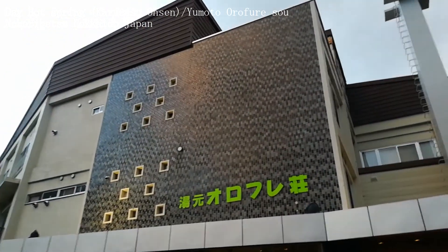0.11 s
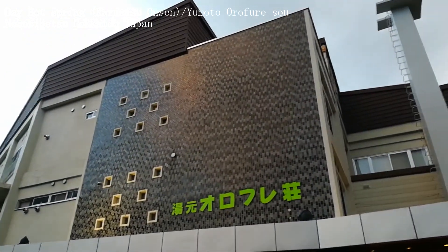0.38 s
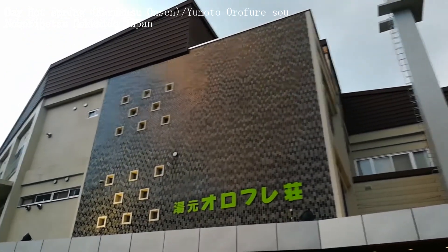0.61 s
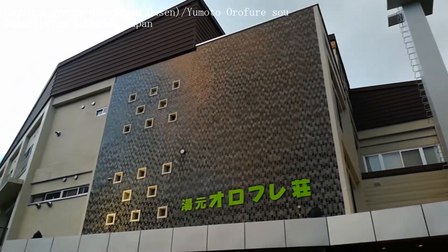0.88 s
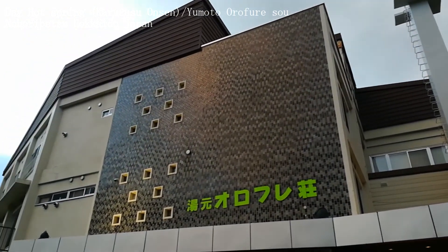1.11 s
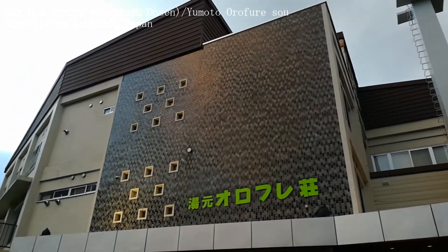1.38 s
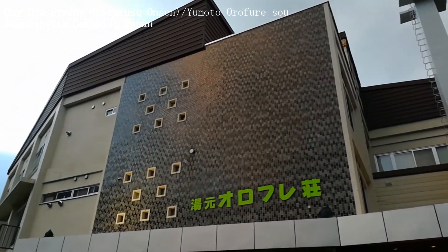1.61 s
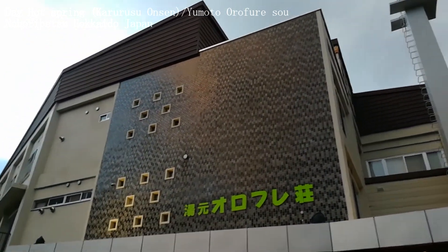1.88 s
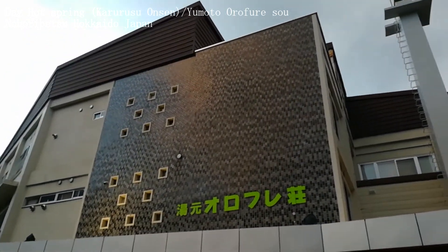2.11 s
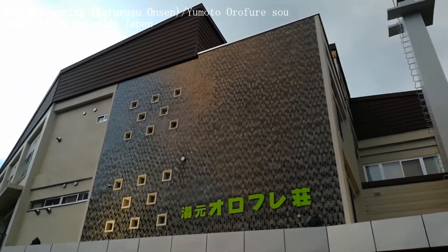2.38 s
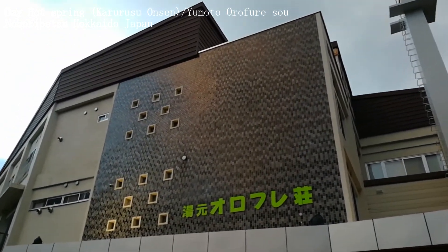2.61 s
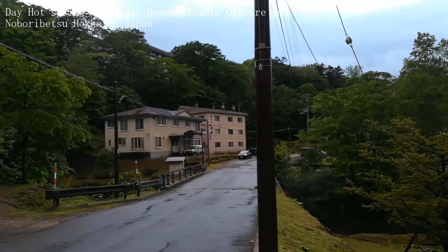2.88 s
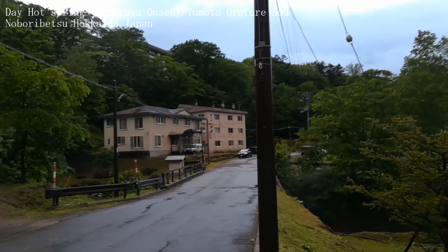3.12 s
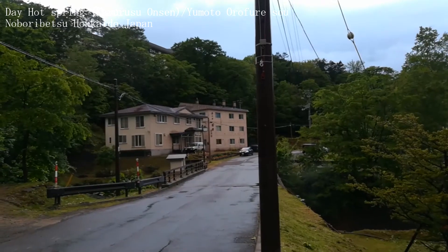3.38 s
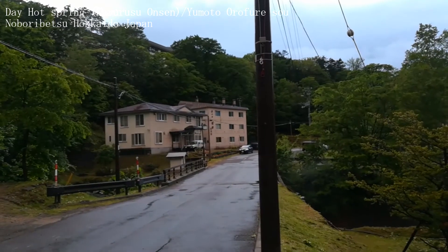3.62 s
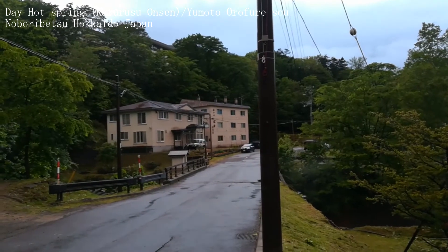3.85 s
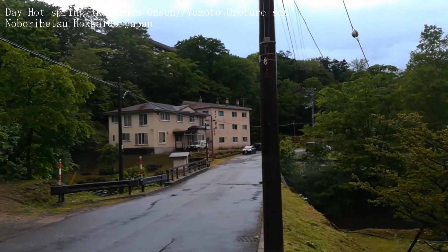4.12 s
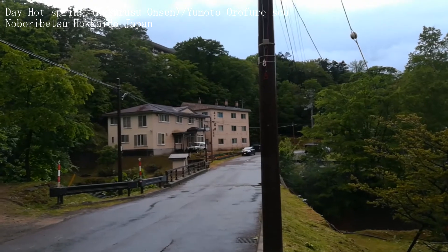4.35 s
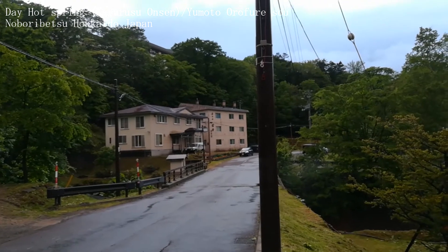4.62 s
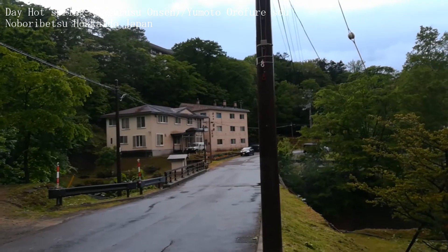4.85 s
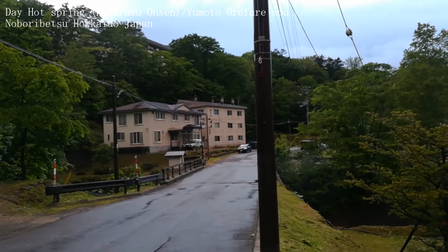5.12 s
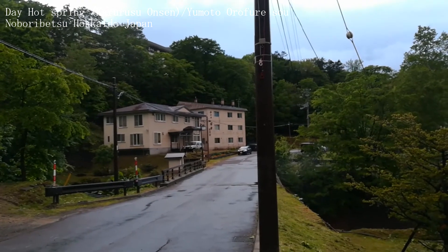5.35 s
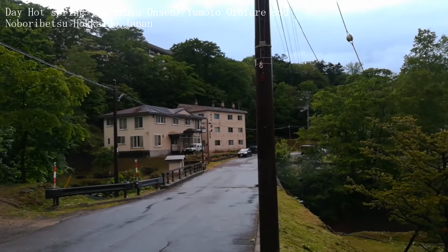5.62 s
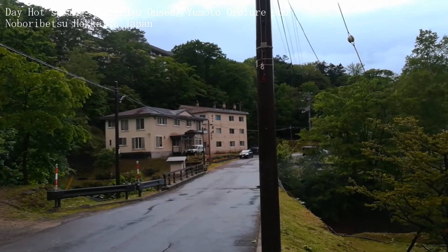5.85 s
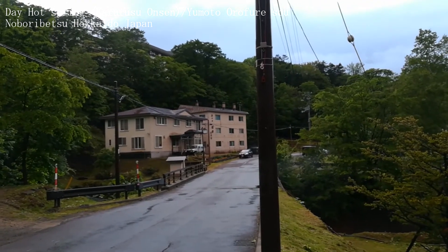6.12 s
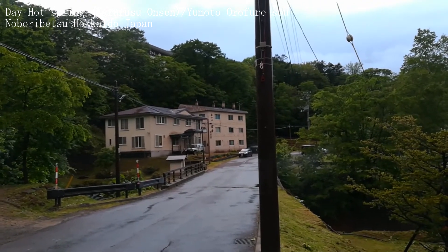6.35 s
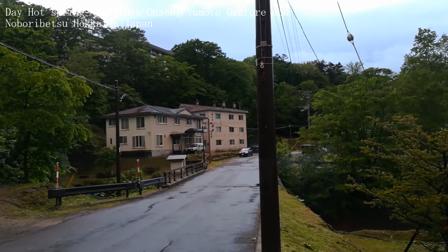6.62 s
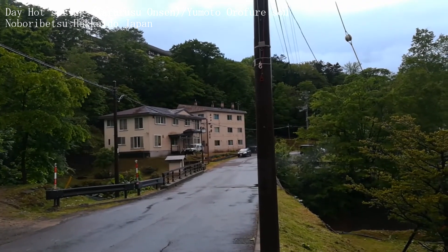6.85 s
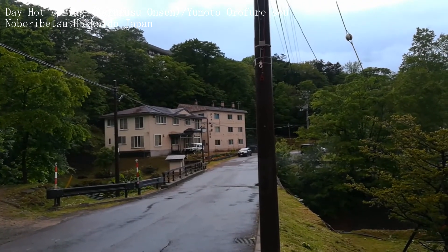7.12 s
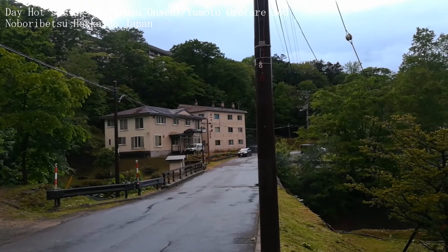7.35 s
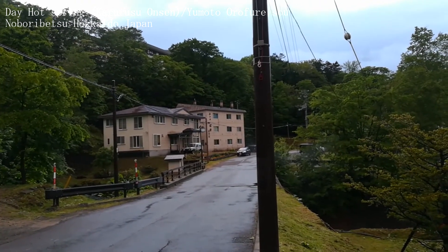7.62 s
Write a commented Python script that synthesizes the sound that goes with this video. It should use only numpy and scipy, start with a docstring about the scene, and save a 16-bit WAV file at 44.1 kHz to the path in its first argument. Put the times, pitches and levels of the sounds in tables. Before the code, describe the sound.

Quiet rushing water and soft wind bumps, two distant bird trills, an abrupt short gap, then a fuller stream with a low unsteady machine hum.

```python
"""Two outdoor shots, both with a stream rushing out of sight (shaped noise, brighter on the left port),
low air rumble rolling under it (slow swells) and light wind bumping the ports (lumps of low noise).
In the first shot a far bird soon trills faintly (short falling tones with a noisy tail).
Then comes a hard cut and a short silence. The second shot fades in, and a machine hums in it
(two unsteady sine tones)."""
import sys
import numpy as np
from scipy import signal
from scipy.fft import rfft, irfft, next_fast_len
from scipy.io import wavfile
from scipy.ndimage import uniform_filter1d, map_coordinates

SR = 44100
rng = np.random.default_rng(int(sys.argv[2]) if len(sys.argv) > 2 else 0)


def gain_from_db(level_db):
    """Turn a decibel level (scalar or array-like) into a linear amplitude factor."""
    decades = np.asarray(level_db, float) / 20
    return 10 ** decades


def wrap_up_sound(samples):
    """Save the sound to the file named by the first command line argument, as 16-bit audio."""
    columns = np.atleast_2d(samples).T
    # keep every value between -1 and 1, then stretch to whole-number steps
    tamed = np.clip(columns, -1, 1)
    steps = np.round(tamed * 32767).astype(np.int16)
    wavfile.write(sys.argv[1], SR, steps)


N = 340893  # length in samples

CUT_S, BACK_S = 2.612, 2.763  # the first shot is cut, the second shot enters (seconds)


def unit(x):
    """Scales each channel to rms 1."""
    return x / np.sqrt(np.mean(x ** 2, axis=-1, keepdims=True) + 1e-20)


def along(points, at, log=False):
    """Reads every column after the first between its points, on a straight or log axis."""
    x, *columns = np.transpose(points)
    warp = np.log1p if log else np.asarray
    return np.array([np.interp(warp(at), warp(x), column) for column in columns])


def wobble(rate):
    """A smooth random curve through a given number of random points a second."""
    points = rng.standard_normal(int(N * rate / SR) + 4)
    return map_coordinates(points, [np.arange(N) * rate / SR])


def bump(t, centre, width):
    """A smooth bell-shaped rise and fall of height 1."""
    return np.exp(-.5 * ((t - centre) / width) ** 2)


def buffet():
    """Light wind bumps each port on its own: low noise in short lumps, stronger during gusts."""
    # Tone colour of the bumps. Each row: frequency in Hz, relative level in dB per Hz.
    bump_colour = [(20, -8), (45, -6.5), (80, 1), (110, -6), (160, -11.5), (300, -40), (20000, -120)]
    # Gusts on the ports. Each row: centre in seconds, half width in seconds, peak in dB.
    gusts = [(1.15, .07, -68), (1.8, .25, -64.5), (2.45, .08, -64), (3.6, .5, -70), (4.8, 0.23, -78)]
    still_db, lumps_db = -78, 4  # the air between gusts, strength of the lumps
    m = next_fast_len(N + 8192)
    colour = gain_from_db(along(bump_colour, np.fft.rfftfreq(m, 1 / SR), log=True))
    air = irfft(rfft(rng.standard_normal((2, m))) * colour, m)[:, :N]
    lumps = gain_from_db(lumps_db * np.array([wobble(14), wobble(14)]))
    air = unit(air * lumps)
    t = np.arange(N) / SR
    gust_gain = sum(gain_from_db(db) * bump(t, centre, width) for centre, width, db in gusts)
    return air * (gain_from_db(still_db) + gust_gain)


def hum():
    """The machine: two sine tones an octave apart, slightly unsteady in pitch and level."""
    # How strong the tones are, before scene() sets them slightly left.
    # Each row: time in seconds, lower tone in dB, upper tone in dB.
    tone_levels = [(2.75, -60, -61.5), (3.4, -62, -61), (3.9, -54.5, -59), (4.1, -53, -68),
                   (4.8, -59.5, -71), (5.3, -60.5, -63.5), (5.7, -59.5, -68), (6.45, -56.5, -79),
                   (6.6, -67, -77)]
    low_hz, drift_hz, flutter_db = 66.6, 0.36, 0.93
    t = np.arange(N) / SR
    phase = 2 * np.pi * np.cumsum(low_hz + drift_hz * wobble(2.89)) / SR
    low_db, high_db = along(tone_levels, t)
    tones = gain_from_db(low_db) * np.sin(phase) + gain_from_db(high_db) * np.sin(2 * phase)
    return np.sqrt(2) * tones * gain_from_db(flutter_db * wobble(6)) * (t > CUT_S)


def bird():
    """Short falling chips at an even pace, each trill moving left; the trees smear them into a tail."""
    # Far trills. Each row: start in seconds, length in seconds, pitch in Hz,
    # left level in dB, right level in dB (before the scatter, turn and tail below).
    trills = [(.205, .26, 3750, -55.5, -63), (.83, .18, 3800, -56.5, -63)]
    note_every_s, note_s = .04, .042
    scatter_hz, scatter_db = 45, 2  # how much the notes differ
    turn_db = 4  # the left gains this much over a trill, the right loses it
    fall = .035  # drop in pitch over a note, as a share of the pitch
    tail_s, tail_gain = .2, .55  # time for the tail to die by 60 dB, strength of the tail
    out = np.zeros((2, N + SR))
    t = np.arange(int(note_s * SR)) / SR
    for start, length, trill_hz, *db in trills:
        for after in np.arange(0, length, note_every_s):
            pitch, *size = rng.standard_normal(3)
            hz = trill_hz + scatter_hz * pitch
            tone = np.sin(2 * np.pi * hz * t * (1 + fall / 2 * (1 - t / note_s)))
            note = np.sin(np.pi * t / note_s) * tone
            turn = turn_db * (after / length - .5) * np.array([1, -1])
            level_db = db + scatter_db * np.array(size) + turn
            first = round((start + after - note_s / 2) * SR)
            out[:, first:first + len(t)] += np.sqrt(2) * gain_from_db(level_db)[:, None] * note
    t = np.arange(SR // 3) / SR
    tail = rng.standard_normal((2, len(t))) * gain_from_db(-60 * t / tail_s)
    tail /= np.linalg.norm(tail, axis=1, keepdims=True)
    smeared = signal.fftconvolve(out, tail, axes=1)[:, :N + SR]
    return (out + tail_gain * smeared)[:, :N]


def rush(colour, stereo):
    """Mixes two noises so that the ports hear partly alike sound, then colours it; rms 1."""
    port_lag_s = 25 / 44100  # the sound reaches the right port first
    m = next_fast_len(N + 8192)
    hz = np.fft.rfftfreq(m, 1 / SR)
    a, b = rfft(rng.standard_normal((2, m)))
    alike, lead = along(stereo, hz, log=True)
    angle = np.arccos(np.clip(alike, 0, 1)) / 2
    turn = np.exp(.5j * (lead + 2 * np.pi * hz * port_lag_s))  # half the lead for each port
    left = (np.cos(angle) * a + np.sin(angle) * b) / turn
    right = (np.cos(angle) * a - np.sin(angle) * b) * turn
    low_cut = 1 / (1 + (20 / (hz + .1)) ** 4)  # fades out what lies below the microphone's reach
    spectrum = np.array([left, right]) * gain_from_db(along(colour, hz, log=True)) * low_cut
    return unit(irfft(spectrum, m)[:, :N])


def stream():
    """Rush and rumble of each shot: the left colour drifts, the bass swells, splashes make it patchy."""
    # Tone colour of the low rumble, then of the water, in the first and in the second shot.
    # Each row: frequency in Hz, left and right relative level in dB per Hz.
    first_rumble, second_rumble = [(22, -15, -15.0), (40, -2, -1), (56, -4, -5), (80, -13, -11),
                                   (105, -14, -13), (150, -12, -16), (191, -11.5, -8.5), (220, -13, -13),
                                   (260, -12, -11.5), (318, -12.5, -13.5), (366, -17.9, -19)], [(22, -15, -15.4), (40, -1, -1.4), (56, -5, -5.4),
                                                        (75, -8, -8.4), (105, -9.5, -10), (150, -10.5, -11),
                                                        (190, -8.1, -8.4), (220, -11.6, -12.1),
                                                        (260, -10.7, -11.3), (320, -14.9, -15.2),
                                                        (380, -15.4, -15.6)]
    first_water, second_water = [(460, -19, -17.5), (650, -18.5, -18), (800, -18.5, -17.5),
                                 (1000, -17.4, -20), (1600, -16.5, -21), (2210, -13.5, -22),
                                 (3000, -13, -22.5), (4200, -15.5, -22.5), (5880, -16, -24.0),
                                 (6960, -22.5, -24.8), (8420, -31.5, -29.5), (10000, -37, -34.5),
                                 (11940, -41, -39.5), (15500, -42.5, -39.5)], [(453, -19, -16.5), (640, -13.5, -14),
                                                     (800, -14.5, -15.5), (950, -16, -17),
                                                     (1600, -15.5, -18), (2210, -13.5, -17.5),
                                                     (3070, -13, -18), (4100, -14, -17.5),
                                                     (6000, -15.5, -19.5), (6920, -19.5, -21),
                                                     (8440, -28.5, -26), (10020, -35, -32),
                                                     (11700, -39.5, -36), (15400, -41, -38.5)]
    # How the two ports differ. Each row: frequency in Hz, left-right likeness from 0 to 1,
    # radians by which the right leads beyond the port lag.
    first_stereo, second_stereo = [(40, .985, -.14), (130, .95, -.36), (250, .96, -.6), (450, .76, -1.1),
                                   (700, .61, -1.7), (1000, .47, -1.8), (1300, .48, -1.9),
                                   (1650, .54, -2.3), (2050, .23, -2), (2450, .43, -2.4), (2900, .2, -2.3),
                                   (3500, .3, -2.8), (4500, .19, -3.2), (7000, .13, -2.3),
                                   (12000, .06, -2.1)], [(40, .995, -.14), (80, .985, -.3), (130, .97, -.5),
                                                        (190, .97, -.75), (250, .96, -1), (350, .85, -1.35),
                                                        (450, .63, -1.7), (700, .64, -2.7),
                                                        (1000, .11, -4.6), (1300, .28, -7),
                                                        (1650, .43, -8.6), (2050, .2, -8.9),
                                                        (2450, .28, -8.8), (2900, .11, -8.6),
                                                        (4500, .12, -8.8), (12000, .03, -7.8)]
    # Base level of the rush in each shot. One row: left in dB, right in dB.
    first_db, second_db = (-46, -50.5), (-45.5, -48.5)
    # Two bright bands on the left. Each row: centre in Hz, width in Hz.
    bright_bands = [(4100, 700), (7000, 1200)]
    # Boost of those bands. Each row: time in seconds, lower band in dB, upper band in dB.
    bright_levels = [(0, 3, 1.5), (.9, 2, 0.5), (1.6, .5, -.3), (2.5, -1.5, 0), (2.8, 0, -.7),
                     (4.8, .5, .7), (5.3, -2, 1), (6.8, -1, 1.6), (7.73, 0.1, 0)]
    # Swells of the rumble. Each row: centre in seconds, rise in dB.
    swells = [(.5, 4), (1.15, 1.5), (1.8, 5.5), (2.95, 5.5), (3.8, 7.5), (4.25, 4), (5.1, 7.5), (6.05, 5.5),
              (6.9, 4), (7.6, 5.5)]
    swell_s, calm_db = .2, -2  # half width of a swell, bass level between swells
    rumble_hz, splash_hz = 90, 700  # swells act mostly below the first, splashes above the second
    sag_db_per_s = 0.28  # the first shot grows slowly quieter
    patchy_db = 0.76

    second = np.arange(N) / SR > CUT_S
    second_rush = rush(second_rumble + second_water, second_stereo)
    first_rush = rush(first_rumble + first_water, first_stereo)
    water = np.where(second, second_rush, first_rush)
    hz, t, z = signal.stft(water, SR, nperseg=1024)
    hz = hz[:, None]

    sagging_db = np.reshape(first_db, (2, 1)) - sag_db_per_s * t
    in_second = t > (CUT_S + BACK_S) / 2
    left_db, right_db = np.where(in_second, np.reshape(second_db, (2, 1)), sagging_db)
    boosts = along(bright_levels, t)
    left_db = left_db + sum(db * bump(hz, *band) for band, db in zip(bright_bands, boosts))

    swell_db = calm_db + sum(db * bump(t, centre, swell_s) for centre, db in swells)
    swell_db = swell_db / (1 + (hz / rumble_hz) ** 4)

    # splashing water: patches some hundred Hz wide and tens of ms long
    patch = uniform_filter1d(rng.standard_normal(z.shape), 12, 1)
    patch = uniform_filter1d(patch, 4, 2)
    splash_db = patchy_db * patch / patch.std() / (1 + (splash_hz / (hz + 1)) ** 2)

    z = z * gain_from_db(np.array([left_db, right_db + 0 * hz]) + swell_db + splash_db)
    return signal.istft(z, SR, nperseg=1024)[1][:, :N]


def scene():
    """Adds all sources at the two ports; the hum is slightly louder on the left."""
    hum_at_ports = hum() * gain_from_db([[.5], [-.5]])  # dB, left and right
    return buffet() + hum_at_ports + bird() + stream()


def band_limit(x):
    """A steep low-pass at the top of the band."""
    return signal.sosfilt(signal.butter(12, 15660, fs=SR, output="sos"), x)


def record(dry):
    """The edit: a hard cut that dies away within some ms, silence, then a fade in from low gain."""
    full_s, enter_gain = 3.03, 0.13  # end of the fade in, gain at its start
    t = np.arange(N) / SR
    dying = gain_from_db(-12 - 2400 * np.clip(t - CUT_S, 0, 1)) * (t < CUT_S + .012)
    first_gain = np.where(t < CUT_S, 1, dying)
    second_gain = np.interp(t, [BACK_S, full_s], [enter_gain, 1])
    mix = dry * np.where(t < BACK_S, first_gain, second_gain)
    return band_limit(mix)


dry = scene()
out = record(dry)
wrap_up_sound(out)
```